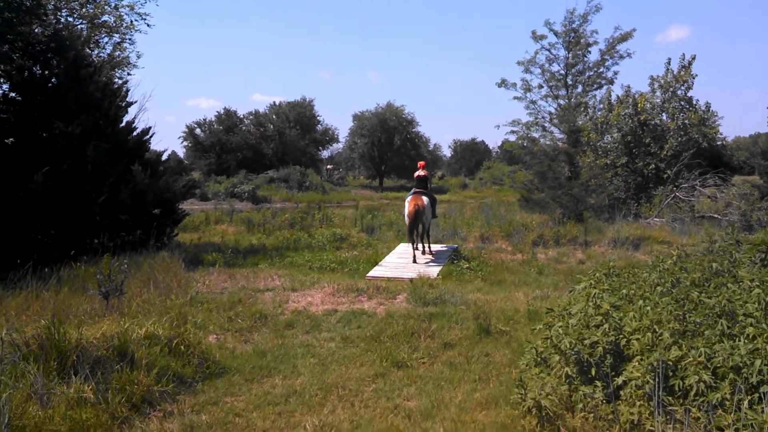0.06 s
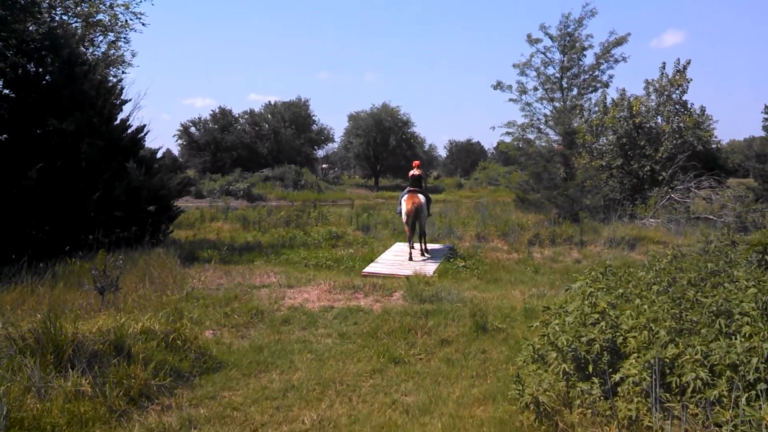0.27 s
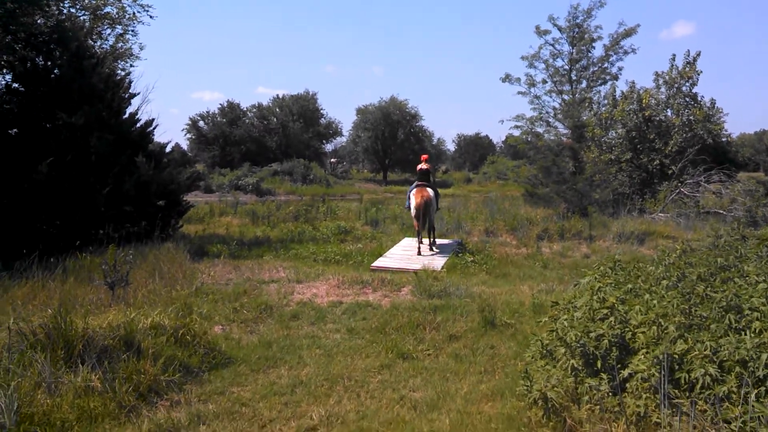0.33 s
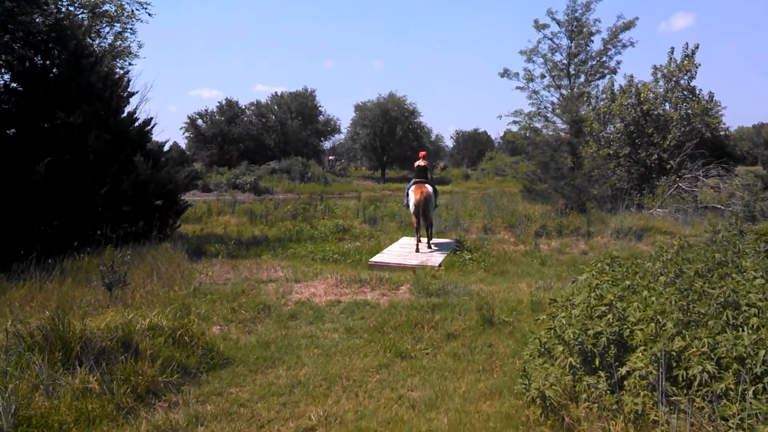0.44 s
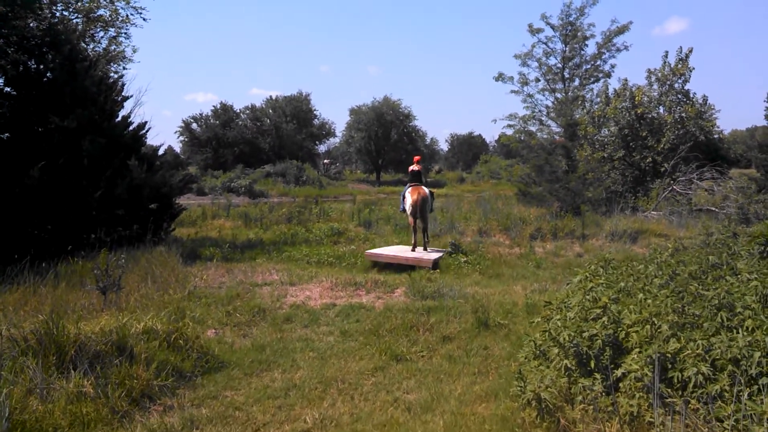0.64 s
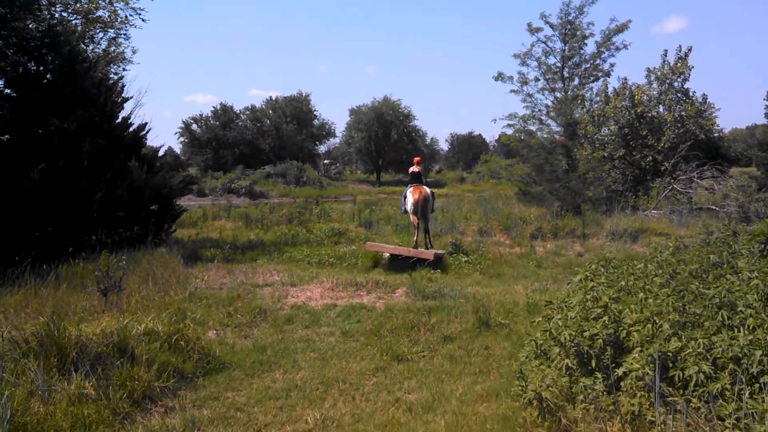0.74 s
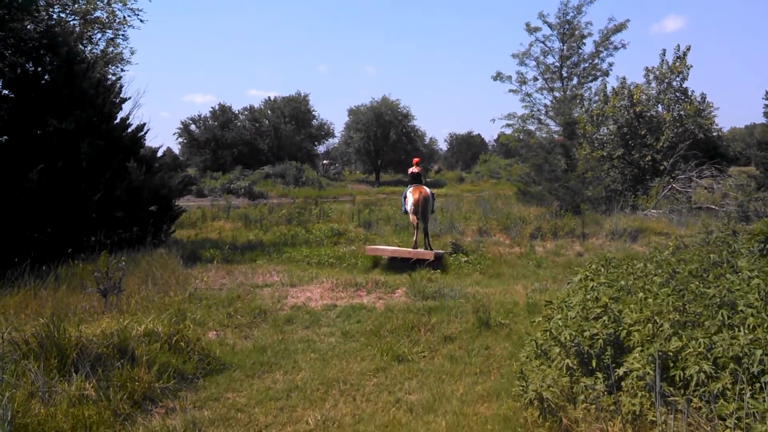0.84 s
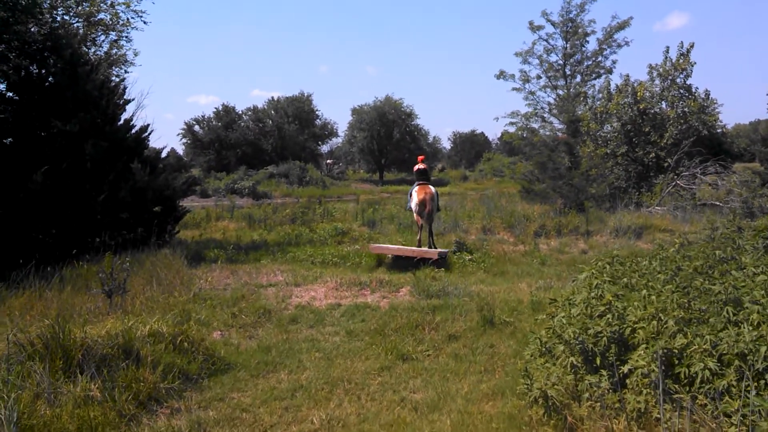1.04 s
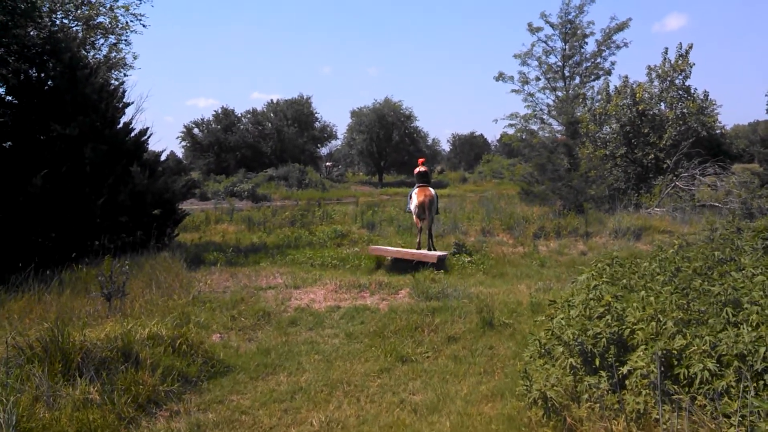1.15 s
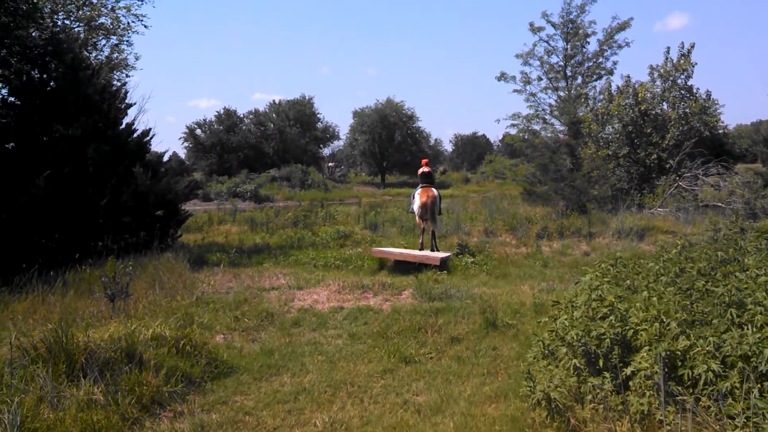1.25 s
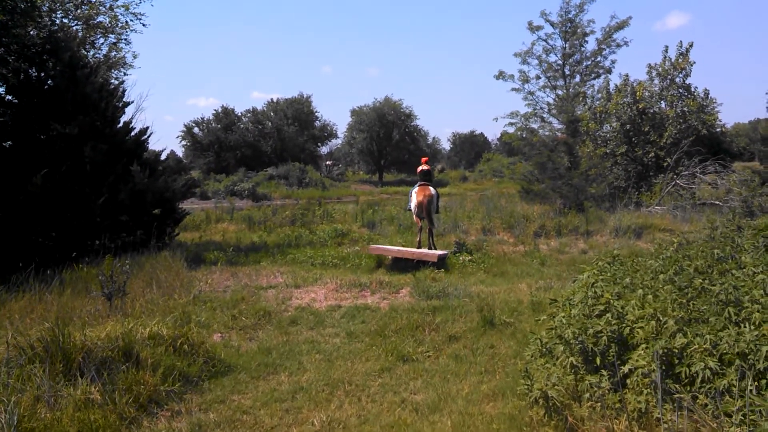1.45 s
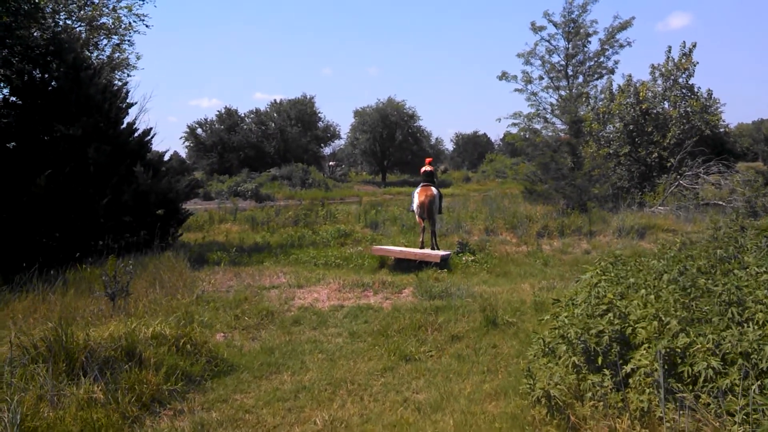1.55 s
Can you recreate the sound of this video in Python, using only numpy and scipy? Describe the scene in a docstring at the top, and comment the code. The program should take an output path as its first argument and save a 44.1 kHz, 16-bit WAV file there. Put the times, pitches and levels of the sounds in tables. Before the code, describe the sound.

A horse's hooves clatter across wooden planks that tip and creak, over soft wind.

```python
"""A horse walks over a wooden seesaw platform in an open field, some way from the microphone.
From the start, wind hisses in the grass and buffets the microphone, and an insect rasps faintly.
A sharp tick with a scrape sounds close by, hoof impacts ring the planks, and a second tick follows.
A hoof drags up to the heavy step that tips the deck; it lands, rattles and creaks by stick-slip
friction as the last knocks fade. The stereo picture is widened throughout."""
import sys
import numpy as np
from scipy import signal
from scipy.fft import rfft, irfft
from scipy.io import wavfile

SR = 44100
rng = np.random.default_rng(int(sys.argv[2]) if len(sys.argv) > 2 else 0)


def master(y):
    """Save y as 16-bit WAV."""
    cut = np.clip(np.atleast_2d(y).T, -1, 1)
    pcm = np.round(cut * 32767)  # scale
    wavfile.write(sys.argv[1], SR, pcm.astype(np.int16))


N = 70560
T = np.arange(N) / SR
HZ = np.maximum(np.fft.rfftfreq(2 * N, 1 / SR), 1)


def undb(db):
    """Decibels to amplitude ratio."""
    return 10 ** (np.asarray(db) / 20)


def level(x, db):
    """Normalisation to an rms level."""
    return x * undb(db) / np.sqrt(np.mean(x ** 2))


def burst(x, length_s, db):
    """Energy normalisation: the rms level a transient would have if confined to length_s."""
    return x * undb(db) / np.sqrt(np.sum(x ** 2) / (length_s * SR))


def add(out, start_s, x):
    """Superposition of a sound at its onset time."""
    i = int(start_s * SR)
    out[i:i + len(x)] += x[:N - i]


def shape(x, gain):
    """Filtering by multiplication of the spectrum."""
    return irfft(rfft(x, 2 * N) * gain)[..., :N]


def band(x, low_hz, high_hz, order=3):
    """Causal band-pass filtering."""
    return signal.sosfilt(signal.butter(order, [low_hz, high_hz], "band", fs=SR, output="sos"), x)


def noise(spectrum, db):
    """Coloured noise: a spectral envelope interpolated over log frequency."""
    hz, density_db = np.array(spectrum, float).T
    gain = undb(np.interp(np.log(HZ), np.log(hz), density_db))
    return level(shape(rng.standard_normal(N), gain), db)


def drift(rate_hz):
    """Random modulation: low-passed noise of unit rms."""
    return level(shape(rng.standard_normal(N), 1 / (1 + (HZ / rate_hz) ** 4)), 0)


def decay(t, t60_s):
    """Exponential damping by 60 dB in t60_s."""
    return np.exp(-np.log(1000) * t / t60_s)


def ring(force, modes, direct=0):
    """Modal response: a force excites damped sinusoids, and may also pass straight through."""
    t = T[:SR // 4]
    response = sum(undb(db) * np.sin(2 * np.pi * hz * t) * decay(t, t60_s) for hz, t60_s, db in modes)
    return signal.fftconvolve(force, response)[:len(force)] + direct * force


# Spectrum of the moving air: frequency_hz, relative_db
AIR_SPECTRUM = [(18, -47), (30, -13), (76, -3.5), (339, -12), (452, -7.5), (513, -7), (561, -1.5),
                (849, -12), (1190, -8), (2200, -29.5), (2860, -35), (4840, -120)]
def air():
    """Turbulence: low broadband noise whose level wavers slightly."""
    murmur = shape(noise(AIR_SPECTRUM, db=-50.5), 1 / (1 + (HZ / 2400) ** 6))
    return murmur * undb(0.54 * drift(rate_hz=3.1))


# Spectrum of wind in the grass: frequency_hz, relative_db
GRASS_SPECTRUM = [(600, -23), (1800, 9.5), (2800, 4.5), (4300, 4), (5500, 1), (8000, 7.5), (10000, -3.5),
                  (12500, 5.5), (15500, 4.5)]
def grass_hiss():
    """Flow noise in grass: uncorrelated mid and side signals share one fast flicker."""
    flicker = undb(1.57 * drift(rate_hz=44))
    return flicker * noise(GRASS_SPECTRUM, db=-51), flicker * noise(GRASS_SPECTRUM, db=-51.5)


# Spectrum of wind on the microphone: frequency_hz, relative_db
RUMBLE_SPECTRUM = [(20, -35), (40, -1), (65, 8), (130, -4.5), (300, -11.5), (600, -18), (1200, -23.5),
                   (2500, -29)]
def rumble():
    """Turbulent pressure at the microphone: a low noise that slowly swells and sinks."""
    return noise(RUMBLE_SPECTRUM, db=-45) * undb(2 * drift(rate_hz=1.5))


# Eddies at the microphone: centre_s, half_width_s, pitch_hz, peak_db
EDDIES = [(0.05, 0.024, 64.1, -32.5), (0.28, 0.011, 85, -27), (0.33, 0.014, 62, -26.5),
          (0.509, 0.0088, 72, -22.5), (0.539, 0.0045, 68, -21.5), (0.586, 0.012, 92, -19),
          (0.593, 0.011, 75.45, -20), (0.712, 0.015, 60, -28), (0.842, 0.0082, 85, -28),
          (0.956, 0.076, 75, -46), (0.101, 0.015, 69.8, -35), (1.432, 0.014, 64.9, -32.5),
          (1.323, 0.029, 62, -32.5)]
def buffets():
    """Pressure fluctuation: each eddy pushes the microphone ports for a few slow, uneven cycles."""
    out = np.zeros(N)
    for centre_s, half_width_s, pitch_hz, peak_db in EDDIES:
        phase = 2 * np.pi * np.cumsum(pitch_hz * (1 + 0.13 * drift(rate_hz=49))) / SR
        out += undb(peak_db) * np.exp(-((T - centre_s) / half_width_s) ** 2 / 2) * np.sin(phase)
    return out


def insect(first_s=0.0234, period_s=0.0712, half_width_s=0.0026):
    """Stridulation: a grasshopper rasps in faint, evenly repeated pulses of treble noise."""
    offset_s = (T - first_s + period_s / 2) % period_s - period_s / 2
    rasp = band(rng.standard_normal(N), 6260, 16200)
    return level(rasp * np.exp(-(offset_s / half_width_s) ** 2 / 2), db=-65)


# Resonances of the scrape: pitch_hz, t60_s, gain_db
SCRAPE_RESONANCES = [(1420, 0.031, 7), (1630, 0.0077, 10), (1980, 0.0076, 9.5), (2450, 0.004, 8),
                     (3000, 0.0099, 8), (3800, 0.016, -1), (4300, 0.013, 4.5), (5500, 0.003, -5),
                     (6450, 0.0084, -19), (6850, 0.0024, -14)]
def scrape(start_s=0.2256, length_s=0.048, fade_s=0.11, release_s=0.003):
    """Sliding friction: the first tick drags on as resonant grit with a wavering squeak."""
    out, t = np.zeros(N), T[:SR // 8]
    pressure = np.exp(-t / fade_s - np.maximum(t - length_s, 0) / release_s)
    grit = rng.standard_normal(len(t)) * pressure
    grit[0] += 3.6  # impulse of first contact
    rasp = band(ring(grit, SCRAPE_RESONANCES, direct=undb(30.5)), 1290, 7800, order=4)
    add(out, start_s, burst(rasp, length_s, db=-37.3))
    pitch_hz = 1420 * (1 + 0.046 * drift(rate_hz=105)[:len(t)])
    squeak = pressure * np.sin(2 * np.pi * np.cumsum(pitch_hz) / SR)
    add(out, start_s, burst(squeak, length_s, db=-48.5))
    return out


# Resonances of a tick: pitch_hz, t60_s, gain_db
TICK_RESONANCES = [(3000, 0.0036, 3.5), (4500, 0.0076, 0), (5340, 0.002, 10.5), (6940, 0.0054, -3),
                   (8140, 0.0033, -3.5), (11900, 0.00055, 10)]
# Sharp ticks close by: start_s, peak_db, cutoff_hz
NEAR_TICKS = [(0.2258, -19.5, 7700), (0.4114, -18, 14700)]
def ticks(grit_decay_s=0.0096):
    """Impulse response: a hard contact with a trace of grit excites high, heavily damped modes."""
    out, t = np.zeros(N), T[:SR // 8]
    for start_s, peak_db, cutoff_hz in NEAR_TICKS:
        force = (t == 0) + 0.0086 * np.exp(-t / grit_decay_s) * rng.standard_normal(len(t))
        tick = band(ring(force, TICK_RESONANCES), 2700, cutoff_hz, order=2)
        add(out, start_s, undb(peak_db) * tick / np.abs(tick).max())
    return out


def field_echo(x, relative_db):
    """Diffuse reflection: the ground and trees return a thin, dull tail."""
    tail = band(rng.standard_normal(N), 260, 8400, order=1) * decay(T, t60_s=0.75)
    return level(signal.fftconvolve(x, tail)[:N], relative_db) * x.std()


def ground_scatter(x, cutoff_hz=290):
    """Phase scattering: the deck's low boom glances off the ground and reaches the ports out of step."""
    glances = rng.standard_normal(N) * decay(T, t60_s=0.033)
    phase_shift = np.exp(1j * np.angle(rfft(glances, 2 * N)))
    return shape(x, phase_shift * undb(-4) / np.hypot(1, HZ / cutoff_hz))


def hoof_drag(peak_s=0.755, rise_s=0.14, release_s=0.024):
    """Sliding friction: grit under a dragging hoof swells up to the heavy step and dies with it."""
    push, size = rng.standard_normal((2, N))
    grit = band(push * np.exp(0.68 * size), 650, 6000, order=1)
    swell = np.exp(np.minimum((T - peak_s) / rise_s, (peak_s - T) / release_s))
    return swell * level(grit, db=-48.5)


# Resonances of the rubbing boards: pitch_hz, t60_s, gain_db
CREAK_RESONANCES = [(1810, 0.029, 14), (3130, 0.0089, -7), (3920, 0.0045, 22), (4300, 0.0042, -16)]
# Creaks of the loaded deck: start_s, length_s, level_db
DECK_CREAKS = [(0.841, .035, -55), (0.951, 0.039, -51), (1.046, 0.033, -48.5), (1.179, 0.074, -54),
               (1.313, 0.038, -55.5)]
def creaks(slips_per_s=110, jitter=0.035):
    """Stick-slip friction: short, nearly periodic runs of slips ring the boards."""
    out = np.zeros(N)
    for start_s, length_s, level_db in DECK_CREAKS:
        gap, size = rng.standard_normal((2, 16))
        times = np.cumsum(1 + jitter * gap) / slips_per_s
        slips = np.zeros(SR // 5)
        for slip_s, strength in zip(times - times[0], undb(2 * size)):
            if slip_s < length_s:
                slips[int(slip_s * SR)] = strength
        add(out, start_s, burst(ring(slips, CREAK_RESONANCES), length_s, level_db))
    return out


def thump(t, pitch_hz, rise_s=0.0056, decay_s=0.0069):
    """Flexural vibration: loaded boards swing briefly at one pitch and a weak inharmonic overtone."""
    swing = np.minimum(t / rise_s, 1) * np.exp(-np.maximum(t - rise_s, 0) / decay_s)
    phase = 2 * np.pi * pitch_hz * t
    return swing * (np.sin(phase) + undb(-13) * np.sin(1.502 * phase))


# Resonances of the planks: pitch_hz, t60_s, gain_db
PLANK_MODES = [(235, 0.015, 16), (306, 0.04, 8), (433, 0.029, -21), (489, 0.041, 3), (550, 0.028, -3.5),
               (651, 0.021, 9), (810, 0.012, -1), (995, 0.018, -4.5), (1080, 0.012, -0.5),
               (1256, 0.014, 1.5), (1680, 0.032, -4.5), (1910, 0.0079, 3.5), (2564, 0.042, -4),
               (4200, 0.016, -2.5)]
# Body, knock, clack and crack bands of the wood: low_hz, high_hz
WOOD_BANDS = [(190, 450), (380, 834), (800, 2360), (2200, 5020)]
# Blows on the deck: start_s, clatter_s, thump_hz, thump_relative_db, body_db, knock_db, clack_db, crack_db
DECK_BLOWS = [(0.2823, 0.0085, 501, -33.5, -36.5, -30.5, -35.5, -38),
              (0.2878, 0.0062, 241.4, -32, -41, -57, -37.5, -42),
              (0.306, 0.0066, 203, -35.5, -54, -62, -61, -58),
              (0.322, 0.01, 184, -42, -66, -46.5, -44.5, -47.5),
              (0.344, 0.012, 165, -48, -55, -61, -50.5, -55),
              (0.406, 0.01, 297, -44.5, -53, -71, -46.5, -46.5),
              (0.6833, 0.0049, 364, -42, -44.5, -43.5, -43.5, -46.5),
              (0.707, 0.015, 240, -58, -51, -47, -55, -49),
              (0.7446, 0.0063, 394.5, -31.5, -39, -37.5, -38, -45),
              (0.754, 0.0096, 674, -36, -38, -33.5, -32.5, -37.5),
              (0.768, 0.014, 278, -42.5, -49, -49.5, -47, -45),
              (0.7988, 0.0086, 313, -38.5, -41, -39.5, -38.5, -47),
              (0.817, 0.016, 141, -32.5, -40, -37, -46.5, -48),
              (0.8276, 0.0008, 240, -45, -55, -44, -24.5, -49),
              (0.835, 0.012, 166, -28, -47, -55, -56, -42.5),
              (.849, 0.017, 160, -33, -41.5, -43, -46.5, -44), (0.877, 0.044, 126, -43, -47, -50, -69, -54),
              (0.909, 0.013, 275, -44, -51, -42, -44, -48.5),
              (0.93, 0.0073, 235, -38.5, -40.5, -37, -38.5, -52),
              (0.945, 0.01, 106, -38.5, -48, -49, -62, -48),
              (0.959, 0.0081, 257, -53, -62, -46.5, -39.5, -44.5),
              (.984, 0.0031, 180, -52, -44, -44, -47, -46),
              (1.005, 0.0092, 526.5, -38.5, -50, -42.5, -45.5, -61),
              (1.015, 0.015, 506, -39, -43.5, -45, -70, -52), (1.042, 0.015, 502, -47, -61, -59, -53, -50),
              (1.118, 0.0031, 164, -35.5, -43, -42, -44.5, -46.5),
              (1.1253, 0.012, 230.5, -33.5, -39.5, -42, -44, -46.5),
              (1.131, 0.01, 153, -37.5, -54.5, -58, -46.5, -53),
              (1.155, 0.023, 133, -42, -55, -70, -76, -55),
              (1.197, 0.016, 157, -37.5, -47, -46.5, -47.5, -48),
              (1.237, 0.013, 148, -46.5, -50, -60, -52, -52.5),
              (1.289, 0.0071, 144, -55, -64, -46, -75, -66), (1.332, 0.015, 170, -68, -50, -53, -76, -54)]
def blows(attack_s=0.0012, thump_lag_s=0.00508, thump_reference_db=4):
    """Impact excitation: a quick clatter of contacts rings the planks, which thump just after."""
    out, t = np.zeros(N), T[:SR // 5]
    for start_s, clatter_s, thump_hz, thump_relative_db, *bands_db in DECK_BLOWS:
        push, size = rng.standard_normal((2, len(t)))
        decay_s = 0.0023 + 0.52 * clatter_s
        span_s = clatter_s + decay_s
        force = np.minimum(t / attack_s, 1) * np.exp(-np.maximum(t - clatter_s, 0) / decay_s)
        contacts = force * push * np.exp(0.58 * size)  # log-normal sizes make the clatter grainy
        wood = ring(contacts, PLANK_MODES, direct=undb(38))
        for (low_hz, high_hz), band_db in zip(WOOD_BANDS, bands_db):
            add(out, start_s, burst(band(wood, low_hz, high_hz), span_s, band_db))
        bright_edge = band(contacts, 4320, 7600, order=2)
        add(out, start_s, burst(bright_edge, span_s, bands_db[-1] - 6))  # 6 dB below the crack
        add(out, start_s + thump_lag_s, undb(thump_reference_db + thump_relative_db) * thump(t, thump_hz))
    return out


# Stereo balance of the deck: time_s, left_minus_right_db
DECK_PAN = [(.3, 2), (.69, -4), (.765, -2), (.83, 3.5), (1.0, 1.5), (1.15, 4.5)]
def scene():
    """Mid-side stereophony: the sources add as the sum and difference of two microphone ports."""
    deck = blows() + creaks() + hoof_drag()
    direct = deck + ticks() + scrape() + insect()
    gusts = buffets()
    hiss_mid, hiss_side = grass_hiss()
    balance = undb(np.interp(T, *np.array(DECK_PAN).T))
    mid = air() + hiss_mid + direct + field_echo(deck, relative_db=-11)
    mid -= undb(-17) * gusts  # eddies push the ports mostly in opposite directions
    side = rumble() + hiss_side + gusts + ground_scatter(deck) + field_echo(deck, relative_db=-16.5)
    side += shape(direct, 1 / (1 + (1630 / HZ) ** 5))  # direct treble lies to the left
    side += deck * (balance - 1) / (balance + 1)
    return np.array([mid + side, mid - side])


def record(dry, widen_hz=1170, lag_s=16 / SR, cutoff_hz=15600):
    """Delayed, inverted crossfeed widens the treble; a slight rightward lean and a low-pass follow."""
    share = 1 / (1 + (widen_hz / HZ) ** 4)
    crossfeed = shape(dry[::-1], share / (1 + share) * np.exp(-2j * np.pi * HZ * lag_s))
    wide = shape(dry, 1 / (1 + share)) - crossfeed
    lean = undb(0.65 / (1 + (400 / HZ) ** 2) / (1 + HZ / 6000))
    low_pass = signal.ellip(10, 0.2, 80, cutoff_hz, fs=SR, output="sos")
    return signal.sosfilt(low_pass, shape(wide, np.array([1 / lean, lean])))


dry = scene()
out = record(dry)
master(out)
```